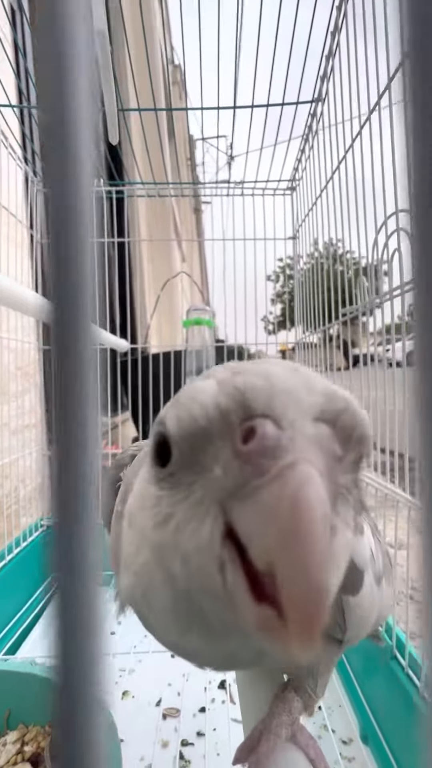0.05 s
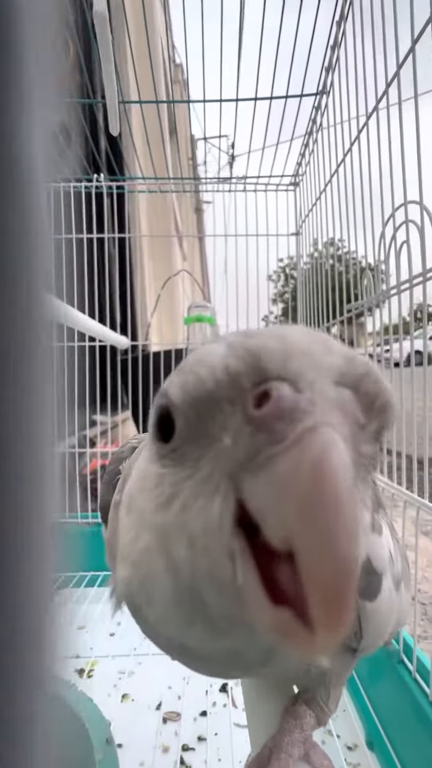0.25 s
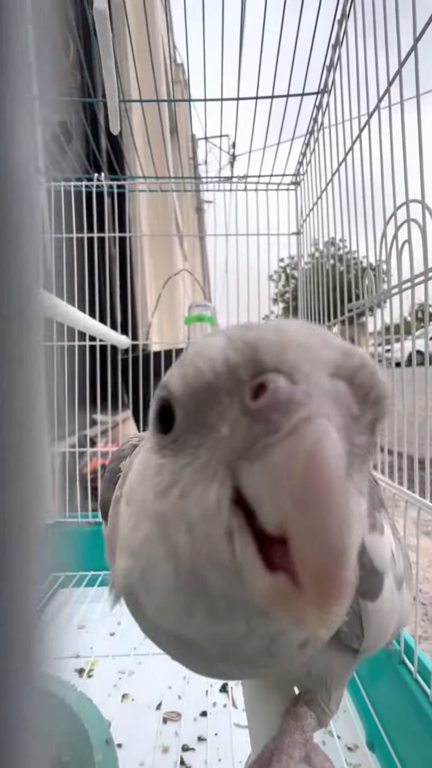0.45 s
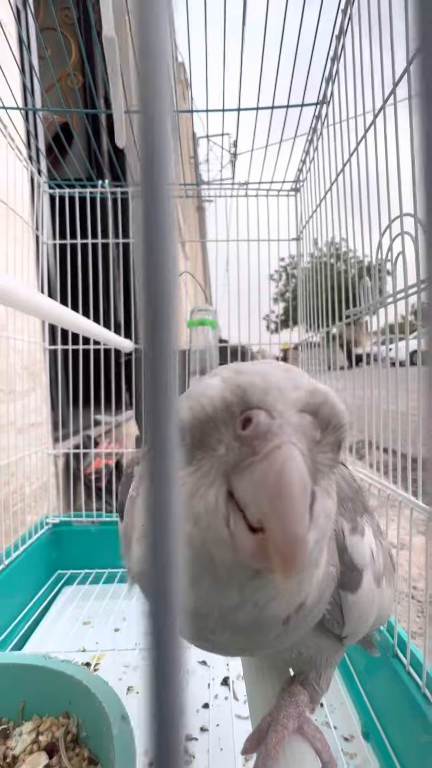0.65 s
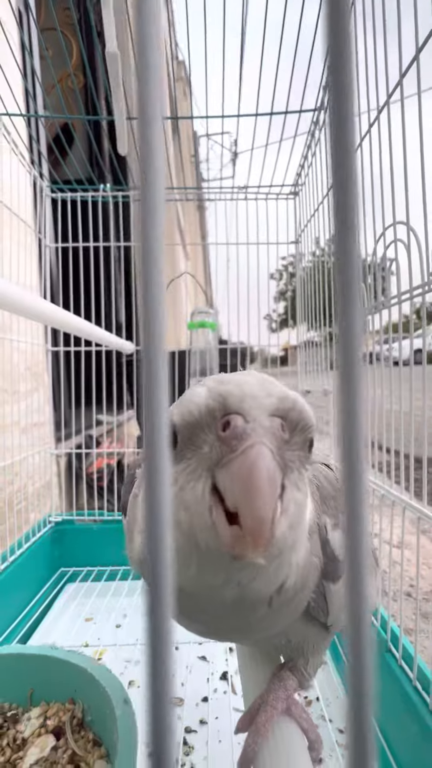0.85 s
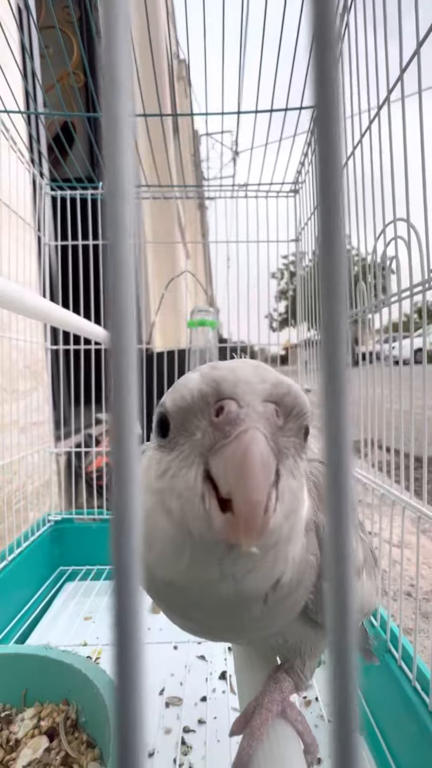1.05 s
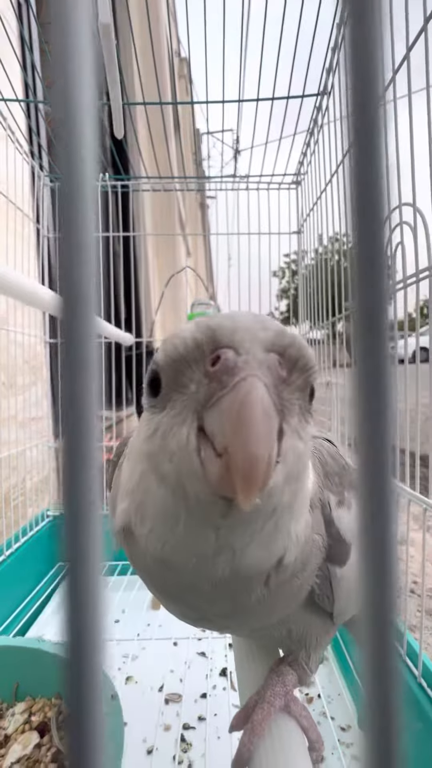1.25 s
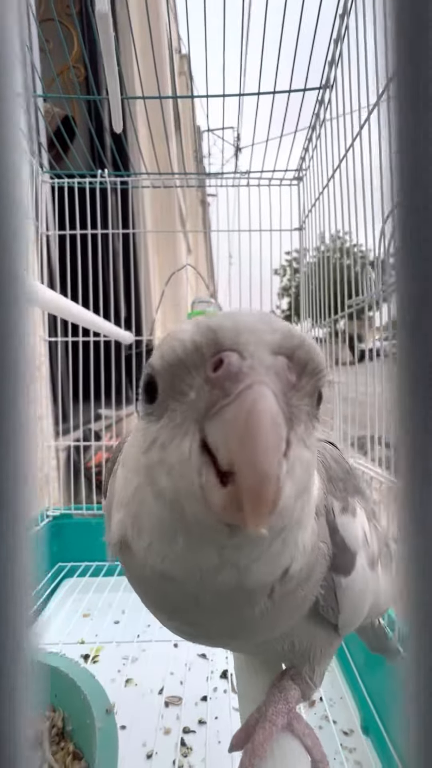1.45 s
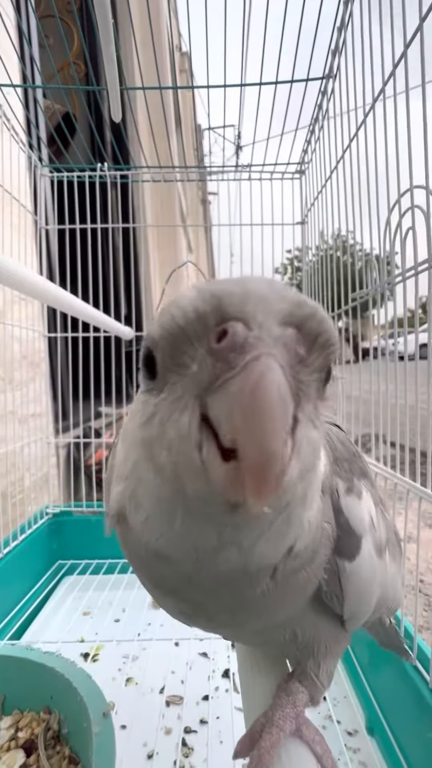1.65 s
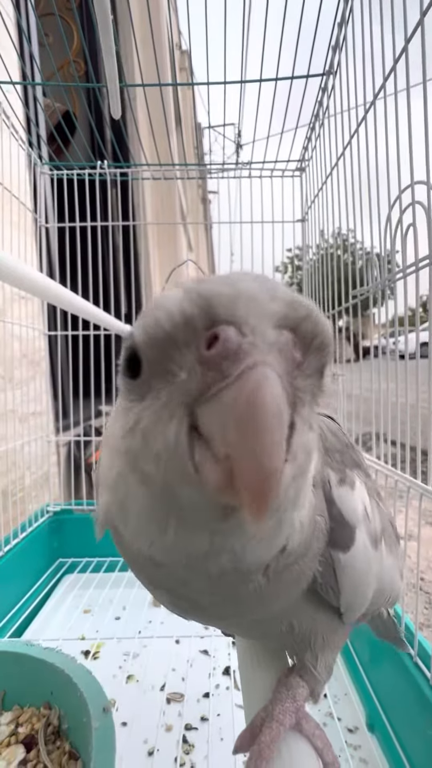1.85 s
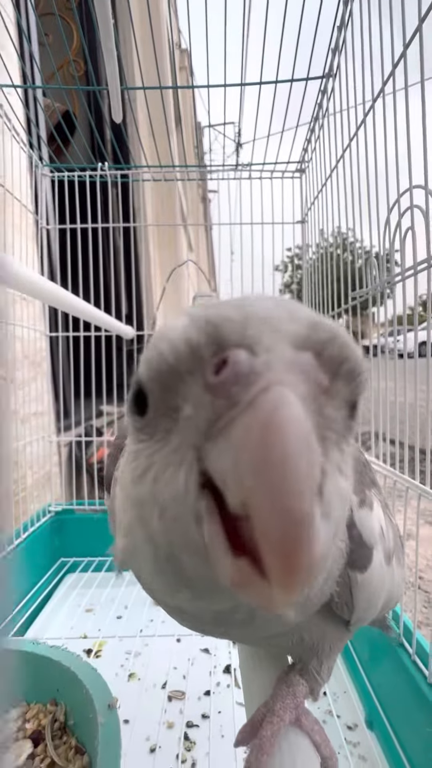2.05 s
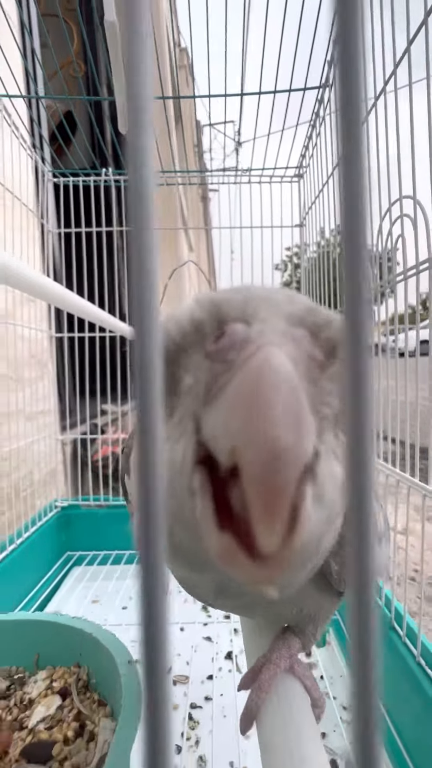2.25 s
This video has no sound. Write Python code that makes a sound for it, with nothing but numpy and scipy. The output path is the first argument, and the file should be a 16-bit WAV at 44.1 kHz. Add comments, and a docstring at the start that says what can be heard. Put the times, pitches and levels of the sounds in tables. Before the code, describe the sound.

A cockatiel close by ticks its beak at about 0.4 seconds, then gives four short, harsh squawks between 0.5 and 1.3 seconds, each falling into a small croak. A soft wheeze follows the first; another comes around 1.5 seconds with more ticks. From 1.5 seconds a distant bird chirps faintly. Street traffic rumbles throughout, with a wavering engine, light hiss and a faint, thin whine.

```python
"""Street traffic rumbles throughout, with one wavering engine, faint air hiss and a thin steady whine.
Close by, a cockatiel in a wire cage ticks its beak, then from 0.5 to 1.3 s spits four short squawks:
syrinx pulses and hiss ring in throat and beak, a harsh rasp clearing into a falling tone and a croak.
A soft wheeze follows the first squawk; another, with more beak ticks, follows the last.
From 1.5 s a bird farther off chirps faintly."""
import sys
import numpy as np
from scipy import signal
from scipy.fft import rfft, irfft
from scipy.io import wavfile
from scipy.ndimage import uniform_filter1d

SR = 44100
rng = np.random.default_rng(int(sys.argv[2]) if len(sys.argv) > 2 else 0)


def pcm_store(signal):
    """Save signal as 16-bit PCM."""
    levels = np.round(np.clip(np.atleast_2d(signal), -1, 1) * 32767)
    wavfile.write(sys.argv[1], SR, levels.astype(np.int16).T)


N = 105840
T = np.arange(N) / SR
HZ = np.maximum(np.arange(N // 2 + 1) * SR / N, 1)
CUTOFF_HZ = 16300


def from_db(db):
    """Decibels to gain."""
    return 10 ** (np.asarray(db) / 20)


def rms_one(x):
    """Scale to unit power."""
    return x / np.sqrt(np.mean(x ** 2) + 1e-20)


def automation(rows):
    """Each column of a curve at every sample."""
    times, *columns = np.transpose(rows)
    return [np.interp(T, times, column) for column in columns]


def at_hz(points):
    """A spectral curve at every frequency."""
    hz, value = np.transpose(points)
    return np.interp(np.log(HZ), np.log(hz), value)


def equalise(x, db):
    """Causal (minimum-phase) EQ with the given gain curve."""
    cepstrum = irfft(np.log(from_db(db)), N)
    cepstrum[1:N // 2] *= 2
    cepstrum[N // 2 + 1:] = 0
    return irfft(rfft(x) * np.exp(rfft(cepstrum)), N)


def highpass(x, edge_hz):
    """The part above an edge."""
    return irfft(rfft(x) / (1 + (edge_hz / HZ) ** 4), N)


def shelf(x, edge_hz, db):
    """Lift or duck the treble."""
    return x + highpass(x, edge_hz) * (from_db(db) - 1)


def bell(centre_hz, width_hz):
    """Shape of a resonance, 1 on top."""
    return 1 / (1 + (2 * (HZ - centre_hz) / width_hz) ** 2)


def drift(rate_hz):
    """Random wander up to about the given rate; spread 1."""
    return rms_one(irfft(rfft(rng.standard_normal(N)) / (1 + (HZ / rate_hz) ** 2), N))


def gate(rows, attack_s, release_s):
    """Opens at a curve's first point and dies away after its last."""
    attack = np.clip((T - rows[0][0]) / attack_s + .5, 0, 1)
    return attack * np.exp(-np.maximum(T - rows[-1][0], 0) / release_s)


def bursts(cues, eq, decay_s):
    """Very short puffs of noise through one EQ."""
    envelope = sum(from_db(db) * gate([(time,)], 0.00031, decay_s) for time, db in cues)
    return equalise(envelope * rng.standard_normal(N), at_hz(eq))


# stereo width of the street: (frequency [Hz], side minus mid [dB])
STEREO_WIDTH = [(30, -15.5), (70, -25), (130, -38.5), (200, -27), (310, -12), (500, -1.5), (1300, -1.5),
                (2000, -2.5), (2800, -1.5), (4100, -6), (5000, 8), (6800, 3), (8100, -7.5), (9000, -1.5)]

def wide_noise(spectrum):
    """Stereo noise bed of unit power, centred in the bass and diffuse in the treble."""
    mid, side = rfft(rng.standard_normal((2, N)))
    width = from_db(at_hz(STEREO_WIDTH))
    stereo = (mid + width * side * [[1], [-1]]) / np.sqrt(1 + width ** 2)
    return rms_one(irfft(from_db(at_hz(spectrum)) * stereo, N))


# colours of rumble, road and tyres: (frequency [Hz], relative level [dB])
RUMBLE_EQ = [(20, -46), (32, -27), (42, -11.5), (62, 0.5), (82, -2.5), (110, 6.5), (150, 2.5), (175, -3.5),
             (220, -19), (400, -40), (2000, -96)]
ROAD_EQ = [(120, -23), (240, -5.5), (320, 6), (385, -4.5), (450, 1), (700, -12.5), (1100, -18.5),
           (2000, -27), (4000, -33), (12000, -59)]
TYRE_EQ = [(300, -15), (600, 0.5), (850, 1.5), (1200, -12), (2000, -16.5), (8000, -67)]
# swell of the traffic: (time [s], rumble level [dB], road level [dB])
TRAFFIC_FADERS = [(0, -32.5, -42.5), (.4, -34.5, -43), (.7, -36.5, -44), (1.0, -35, -43), (1.35, -37, -45),
                  (1.6, -33.5, -49), (1.9, -35, -51), (2.15, -38, -52), (2.4, -34, -49.5)]
# swell of the tyres: (time [s], level [dB])
TYRE_FADER = [(0, -58), (.5, -54.5), (1.0, -52), (1.5, -56), (1.85, -54.5), (2.05, -56.5), (2.25, -50.5),
              (2.4, -52.5)]

def traffic():
    """Passing cars: low rumble, road noise and tyre wash rise and fall."""
    rumble_db, road_db = automation(TRAFFIC_FADERS)
    tyre_db, = automation(TYRE_FADER)
    rumble = from_db(rumble_db) * wide_noise(RUMBLE_EQ)
    road = from_db(road_db) * wide_noise(ROAD_EQ)
    return rumble + road + from_db(tyre_db) * wide_noise(TYRE_EQ)


# engine hum: (time [s], pitch [Hz], level [dB])
ENGINE_HUM = [(0, 148.8, -40), (.3, 149.9, -37), (.45, 127.9, -39.5), (.6, 137.3, -41), (.74, 121.4, -32.5),
              (1.0, 126.1, -37), (1.15, 131.7, -34), (1.38, 136.3, -34), (1.65, 119.6, -38),
              (1.85, 100.2, -36.5), (2.0, 99.36, -39.5), (2.13, 80, -40), (2.26, 116.5, -41.5),
              (2.4, 123.7, -49)]

def engine(waver_hz=3, waver_db=2):
    """One engine hums, unsteady in pitch and level."""
    hz, db = automation(ENGINE_HUM)
    phase = 2 * np.pi * np.cumsum(hz + waver_hz * drift(13.7)) / SR
    return np.sqrt(2) * np.sin(phase) * from_db(db + waver_db * drift(6.2))


# colour of the air: (frequency [Hz], relative level [dB])
AIR_EQ = [(600, 10), (1500, 2.5), (2700, 3), (3500, -3), (4200, -8.5), (5400, 1), (7000, 0.5), (8600, -5),
          (9800, -12), (11200, -11), (12800, -27), (15500, -26.5)]

def air(level_db=-52.5):
    """A faint, even bed of hiss."""
    return from_db(level_db) * wide_noise(AIR_EQ)


# harmonics 1-3 of the whine: (level [dB], right channel's lead [rad])
WHINE_HARMONICS = [(-51, 1.0), (-72, .3), (-70, 3.0)]

def whine(pitch_hz=1737):
    """A thin steady tone hangs in the air."""
    phase = 2 * np.pi * pitch_hz * T
    return sum(np.sqrt(2) * from_db(db) * np.sin(k * phase + np.array([[0], [lead]]))
               for k, (db, lead) in enumerate(WHINE_HARMONICS, 1))


# beak ticks: (time [s], level before EQ [dB])
TICK_CUES = [(.369, -47), (0.433, -38), (1.4966, -33.5), (1.565, -43.5), (1.7913, -40.5)]
# their colour: (frequency [Hz], gain [dB])
TICK_EQ = [(2000, -7), (4800, -6), (7000, 4), (11000, 1.5), (15000, -14)]

def beak_ticks():
    """The beak clicks, light and dry."""
    return bursts(TICK_CUES, TICK_EQ, decay_s=0.0014)


def syrinx(hz, rough, jitter=.09, smear_rad=0.448):
    """Bright pulses; roughness trades them for pulsed hiss and adds jitter and period doubling."""
    phase = 2 * np.pi * np.cumsum(hz * (1 + jitter * rough * drift(700))) / SR
    # the windpipe smears each pulse
    pulses = sum(np.cos(k * phase + smear_rad * k * k) * (k * hz < CUTOFF_HZ) for k in range(1, 20))
    tone = pulses * np.sqrt(2 * hz / CUTOFF_HZ) * (1 + rough * np.cos(phase / 2))
    hiss = 0.68 * rng.standard_normal(N) * (1 + np.cos(phase))
    rasp = 0.79 * highpass(rng.standard_normal(N), 5000)   # stays even where the tone is clear
    return np.sqrt(1 - rough ** 2) * tone + rough * hiss + rasp


# colour of the voice: (frequency [Hz], gain [dB])
VOICE_EQ = [(300, -26.5), (650, -10), (950, 0.5), (1400, 3), (2100, -0.5), (3000, -5.5), (5000, -5.5),
            (7500, 0.5), (9200, -14), (12000, -12.5), (13300, -29.5), (14400, -15), (16000, -46)]

def throat_eq(mouth, widths_hz=(1700, 1250, 1930)):
    """Gain in dB of throat and beak: a narrow beak ring, treble tilt, low body and three resonances."""
    *resonances, treble_db, body_db = mouth
    eq = at_hz(VOICE_EQ) + 2.5 * bell(3670, 820)   # ring of the open beak
    eq += treble_db * HZ ** 2 / (HZ ** 2 + 5000 ** 2)
    eq += body_db * bell(960, 200)
    for centre_hz, lift_db, width_hz in zip(resonances[0::2], resonances[1::2], widths_hz):
        eq += lift_db * bell(centre_hz, width_hz)
    return eq


# the four squawks: (time [s], pitch [Hz], level [dB], roughness [0-1])
CALL_1 = [(0.5118, 1920, -19, 0.71), (.515, 1851, -13.5, 0.71), (0.519, 1842, -12, 0.91),
          (.524, 1314, -12, 0.44), (0.529, 1310, -15, 0), (0.535, 1177, -19, .25), (0.539, 903, -21, 0.42),
          (.546, 840, -26.5, 0.1), (0.55, 621, -36, 0.33), (.572, 602, -47.5, 0.8)]
CALL_2 = [(0.7884, 2768, -13.5, 0.88), (0.793, 2421, -10.5, 0.62), (0.798, 1582, -11.5, 0.17),
          (.803, 1503, -19, 0.067), (.805, 1354, -17, 0.16), (0.809, 1283, -18.5, 0.068),
          (0.812, 904, -21, 0.2), (0.82, 730, -42.5, 0.88)]
CALL_3 = [(1.006, 1450, -32, 0.7), (1.01, 1760, -25.5, 1), (1.017, 1517, -21, 0.22),
          (1.022, 1478, -22, 0.07), (1.025, 1725, -18, 0.044), (1.033, 1406, -20, 0.06),
          (1.04, 1305, -23.5, 0.06), (1.047, 1438, -21, 0.1), (1.055, 1215, -23, 0.22),
          (1.06, 930, -32.5, 0.5), (1.072, 732, -42, .45)]
CALL_4 = [(1.2086, 1344, -21.5, 0.85), (1.214, 1411, -13.5, 0.7), (1.219, 984, -17, 1),
          (1.228, 1020, -14.5, 0.42), (1.234, 1156, -21, 0.65), (1.241, 1117, -26.5, 0.24),
          (1.246, 1189, -24.5, .13), (1.252, 984, -31.5, 0.1), (1.256, 826, -28.5, .12),
          (1.263, 597, -42, 0.23)]
# throat and beak resonances, a row per squawk:
# (low [Hz], lift [dB], middle [Hz], lift [dB], high [Hz], lift [dB], treble [dB], body [dB])
MOUTH_SHAPES = [(3680, 15, 6600, 11.5, 10700, 19.5, 1.5, 3.5), (4080, 14, 6040, 11, 11280, 15, 3, -1.5),
                (3591, 17, 5200, 6.5, 10320, 17.5, -7.5, 0), (4040, 19, 6140, 7, 11230, 18, 2, -1)]

def squawk(curve, mouth, attack_s=0.00071, spit_db=10, click_db=-10):
    """The syrinx sounds through the throat, with a spit and a very short, bright click at the onset."""
    hz, db, rough = automation(curve)
    onset = curve[:1]
    voice = equalise(syrinx(hz, np.clip(rough, 0, 1)), throat_eq(mouth))
    voice = shelf(voice, 8450, 2 * (db - db.max()))   # the top fades faster as effort drops
    voice = shelf(voice, 9800, spit_db * gate(onset, attack_s, release_s=0.0077))
    levelled = voice / np.sqrt(uniform_filter1d(voice ** 2, size=220) + 1e-9)   # over 5 ms
    top_click = rms_one(highpass(highpass(rng.standard_normal(N), 12000), 12000))
    top_click *= from_db(click_db + db[0]) * gate(onset, attack_s, release_s=.003)
    return levelled * from_db(db) * gate(curve, attack_s, release_s=0.0018) + top_click


# throat pulses: (time [s], level before EQ [dB])
CROAK_CUES = [(.5796, -29), (.8192, -30), (1.069, -26.5), (1.2625, -22), (1.2708, -26.5), (1.2728, -31),
              (1.28, -39)]
# their colour: (frequency [Hz], gain [dB])
CROAK_EQ = [(800, 4.5), (2500, -1.5), (3650, 10), (4800, -9.5), (6900, 5), (9000, -11), (11000, -7),
            (15000, -28.5)]

def croaks():
    """Last slack pulses of the throat as each squawk dies."""
    return bursts(CROAK_CUES, CROAK_EQ, decay_s=.001)


# two wheezes, a curve each: (time [s], centre [Hz], level [dB], whistle mix [0-1])
WHEEZE_CURVES = [
    [(.67, 5530, -60, 0.1), (.692, 5000, -59, 0), (.707, 5200, -53, 0.1), (.722, 3970, -50.5, 0.1),
     (.752, 3420, -50.5, 0.45), (.782, 4040, -44, 0.6)],
    [(1.43, 4310, -66, 0.33), (1.49, 4200, -57, 0), (1.52, 4500, -56, 0.1), (1.552, 4395, -54, 0.4),
     (1.56, 3470, -50, 0.7), (1.568, 3610, -43, 0.54), (1.588, 3790, -43, 0.8), (1.602, 3360, -53.5, 0.1)],
]

def wheeze(curve, width_hz=630, flutter_db=1):
    """The bird's breath flutters in one gliding resonance and now and then clears toward a whistle."""
    hz, db, mix = automation(curve)
    phase = 2 * np.pi * np.cumsum(hz) / SR
    band = drift(width_hz) * np.cos(phase) + drift(width_hz) * np.sin(phase)
    breath = (1 - mix) * band * from_db(flutter_db * drift(45))
    whistle = mix * np.sqrt(2) * np.cos(phase)
    return (breath + whistle) * from_db(db) * gate(curve, attack_s=0.026, release_s=.012)


# notes of the far bird: (time [s], pitch [Hz], level [dB])
CHIRP_CUES = [(1.52, 5450, -52), (1.533, 3720, -48), (1.597, 2860, -52), (1.62, 3740, -52.5),
              (1.647, 2640, -57), (1.68, 2860, -58), (2.32, 2644, -53.5), (2.332, 2930, -53.5),
              (2.347, 3330, -56), (2.348, 3920, -57.5), (2.367, 3270, -56)]

def far_chirps(length_s=0.024, blur_depth=0.86, blur_hz=150):
    """Thin notes swell and fade, blurred by their way through the street."""
    notes = sum(from_db(db) * np.exp(-(2 * (T - time) / length_s) ** 2) * np.sin(2 * np.pi * hz * T)
                for time, hz, db in CHIRP_CUES)
    blur = 1 + blur_depth * np.array([drift(blur_hz), drift(blur_hz)])
    return notes * blur / np.sqrt(1 + blur_depth ** 2)


# the cockatiel's stereo image: (frequency [Hz], left minus right [dB])
BIRD_PAN = [(1200, 1.5), (2200, -1), (2750, -2), (3300, 5.5), (3700, 0), (4650, 2.5), (5050, -9.5),
            (5700, -10), (6200, 8), (6800, -4), (7400, -0.5), (8000, -1.5), (15000, -0.5)]
# its phase between the microphones: (frequency [Hz], left lead [rad])
BIRD_LEAD = [(300, 0.36), (650, 1), (1200, -0.33), (2500, 0.073), (3050, 1.6), (3500, -0.036),
             (6100, -0.25), (6500, -0.56), (8000, -1.1), (8800, -1.24), (15000, -1.64)]
# echoes off tray, bars and wall: (left delay [s], right delay [s], gain [dB])
REFLECTIONS = [(.0021, .0023, -22), (.0045, .0043, -16.5), (.0077, .0078, -17), (0.0185, 0.017, -28)]

def cage(bird, tail_db=-39.5, t60_s=0.26):
    """The bird reaches two microphones directly, by early reflections and by a short tail."""
    echoes = sum(from_db(db) * np.exp(-2j * np.pi * HZ * np.array([[left], [right]]))
                 for left, right, db in REFLECTIONS)
    sides = np.array([[.5], [-.5]])
    image = from_db(sides * at_hz(BIRD_PAN)) * np.exp(1j * sides * at_hz(BIRD_LEAD))
    tail = rms_one(rng.standard_normal((2, N)) * np.exp(-np.log(1000) * T / t60_s)) / np.sqrt(N)
    return irfft(rfft(bird) * (image * (1 + echoes) + from_db(tail_db) * rfft(tail)), N)


def scene():
    """Street bed behind, the caged cockatiel up front, another bird in the distance."""
    street = traffic() + engine() + air() + whine()
    bird = beak_ticks()
    bird += sum(map(squawk, (CALL_1, CALL_2, CALL_3, CALL_4), MOUTH_SHAPES))
    bird += croaks() + sum(map(wheeze, WHEEZE_CURVES))
    return street + cage(bird) + far_chirps()


def record(dry):
    """Soft clipping rounds the highest peaks; a steep low-pass cuts the top."""
    rounded = dry / (1 + dry ** 4) ** .25
    return signal.sosfilt(signal.cheby2(14, 70, CUTOFF_HZ + 300, fs=SR, output="sos"), rounded)


dry = scene()
out = record(dry)
pcm_store(out)
```